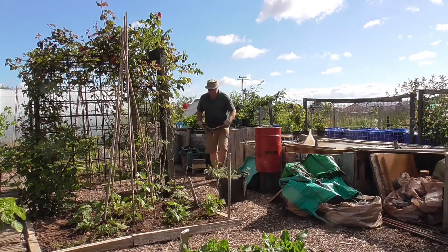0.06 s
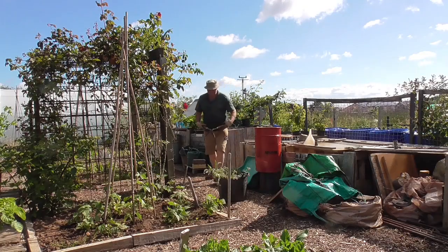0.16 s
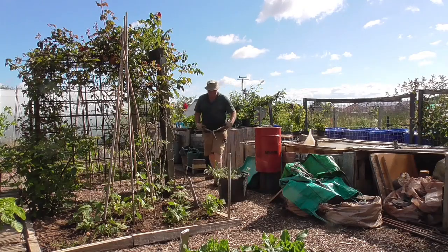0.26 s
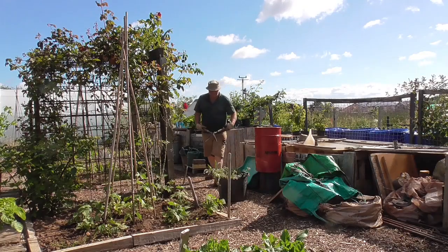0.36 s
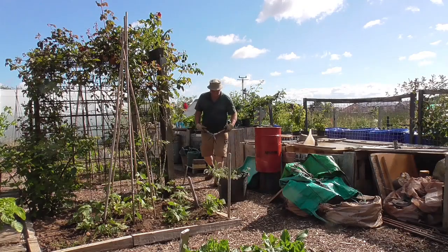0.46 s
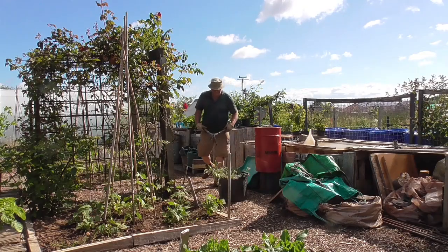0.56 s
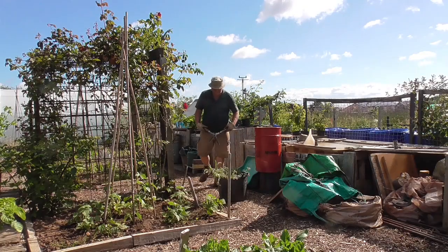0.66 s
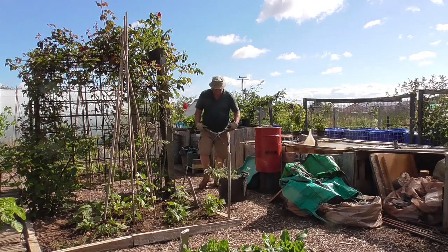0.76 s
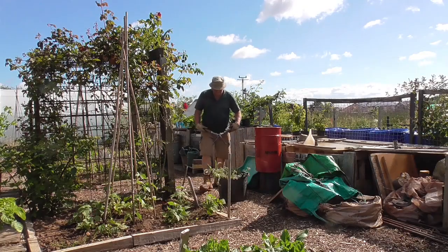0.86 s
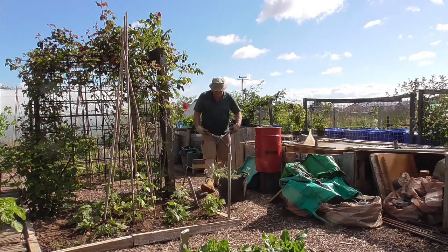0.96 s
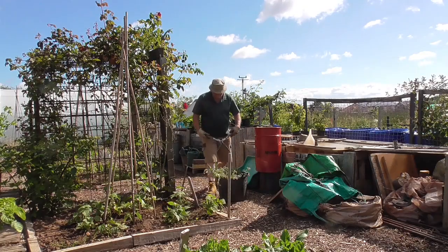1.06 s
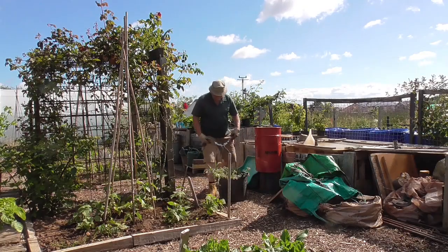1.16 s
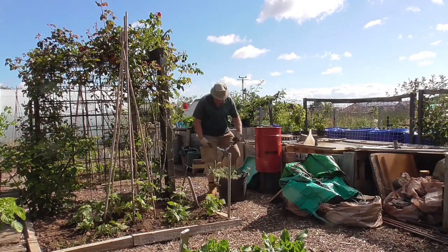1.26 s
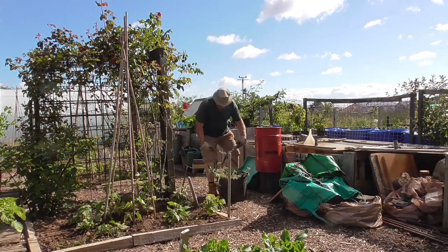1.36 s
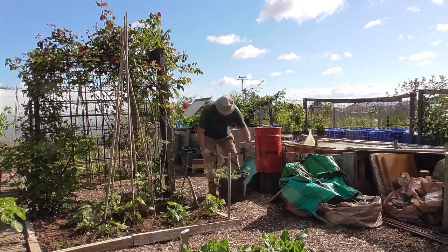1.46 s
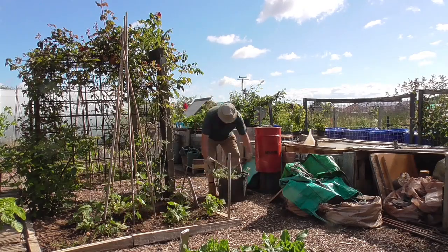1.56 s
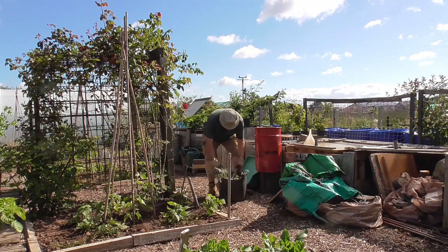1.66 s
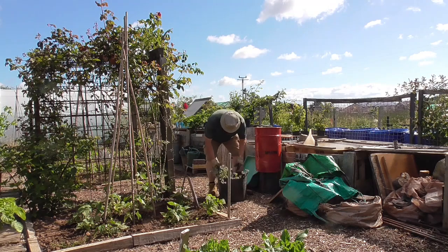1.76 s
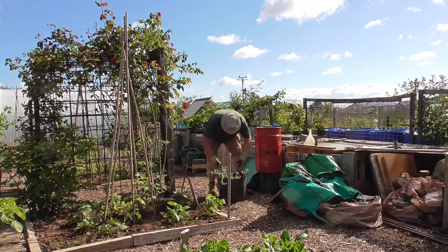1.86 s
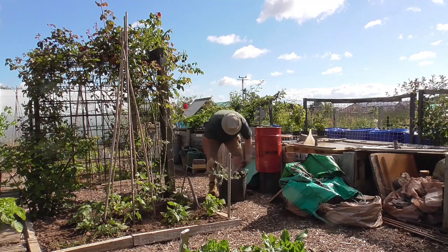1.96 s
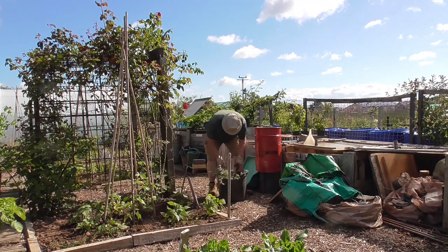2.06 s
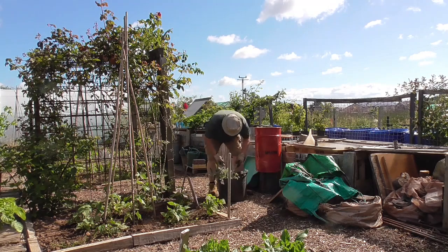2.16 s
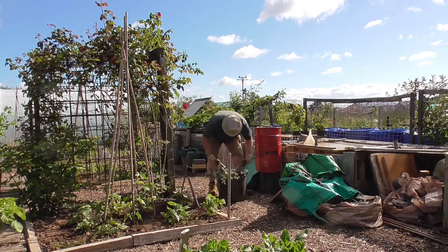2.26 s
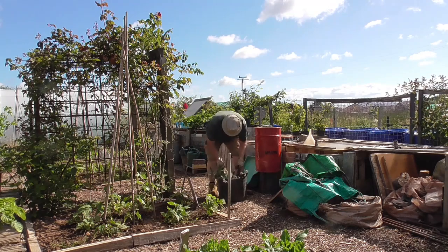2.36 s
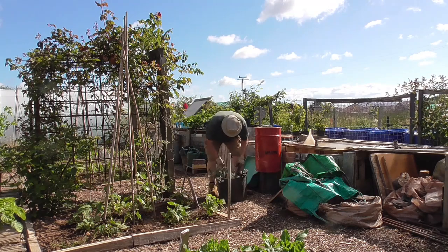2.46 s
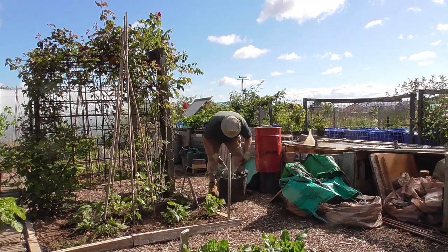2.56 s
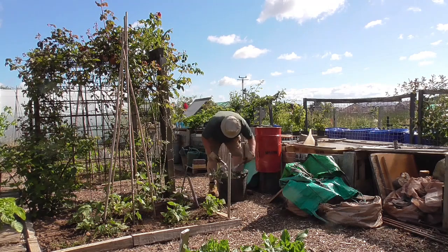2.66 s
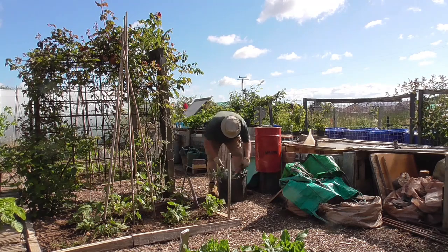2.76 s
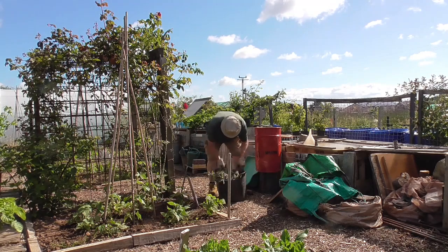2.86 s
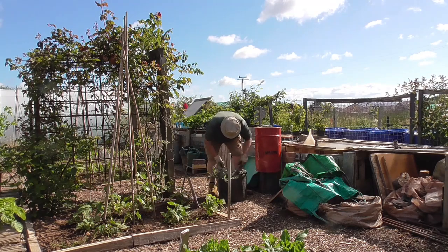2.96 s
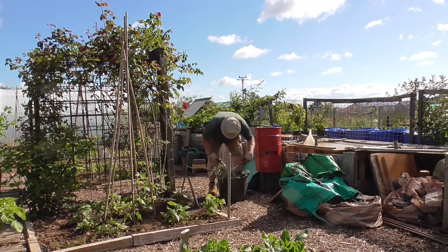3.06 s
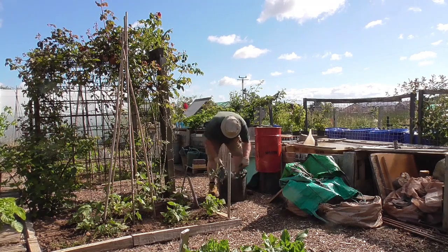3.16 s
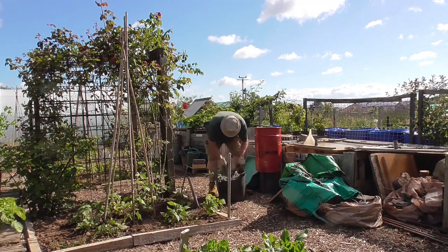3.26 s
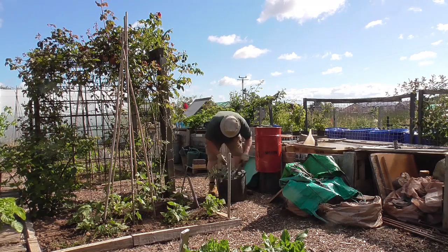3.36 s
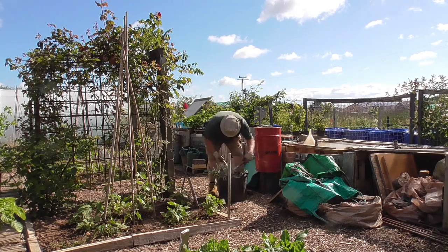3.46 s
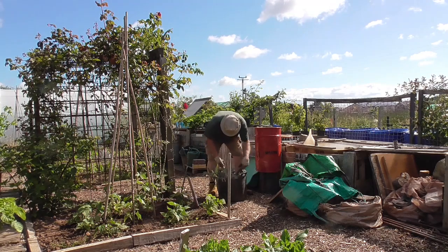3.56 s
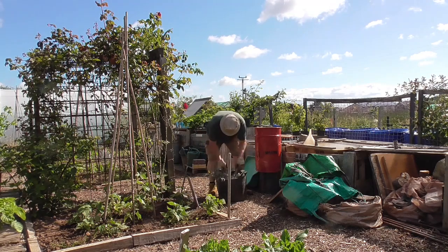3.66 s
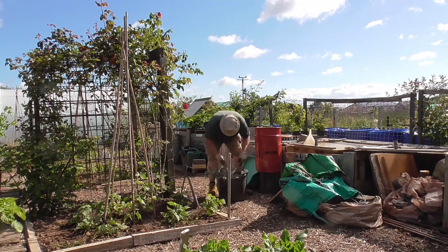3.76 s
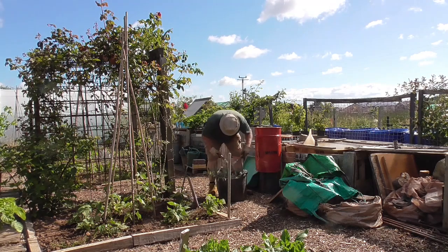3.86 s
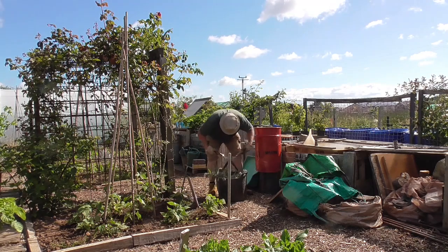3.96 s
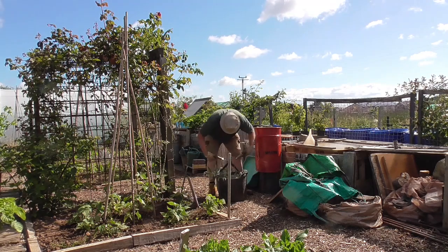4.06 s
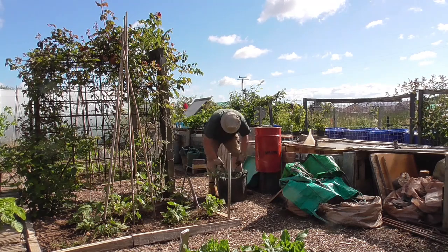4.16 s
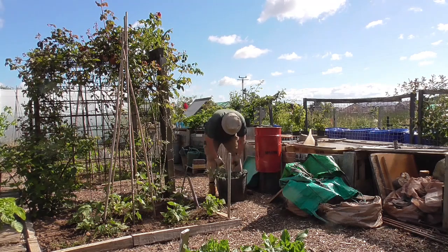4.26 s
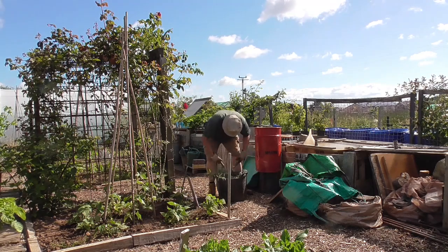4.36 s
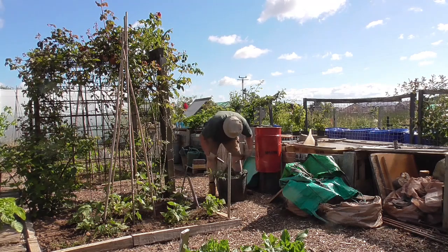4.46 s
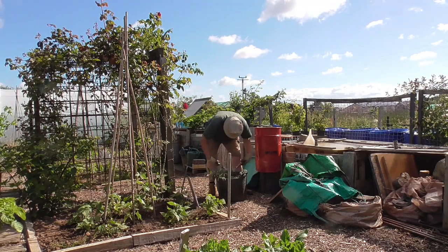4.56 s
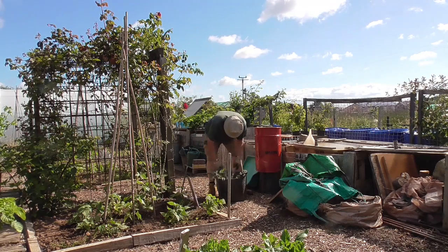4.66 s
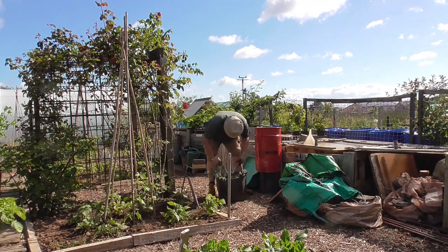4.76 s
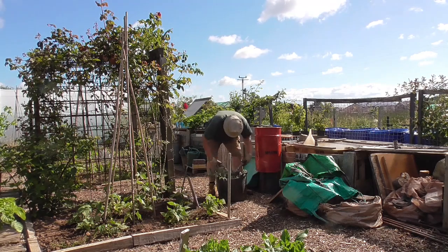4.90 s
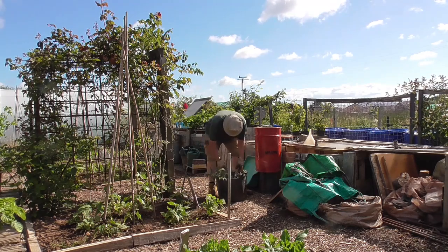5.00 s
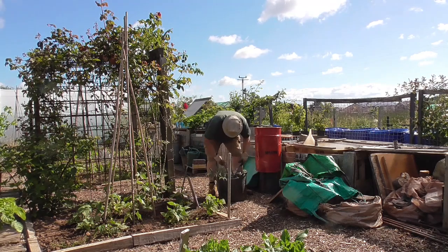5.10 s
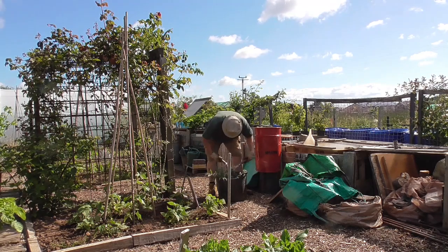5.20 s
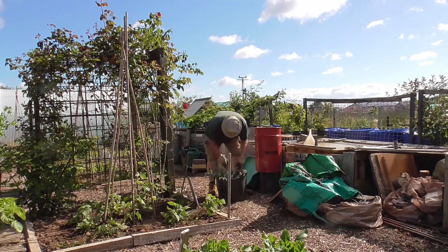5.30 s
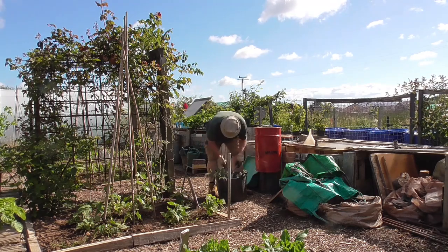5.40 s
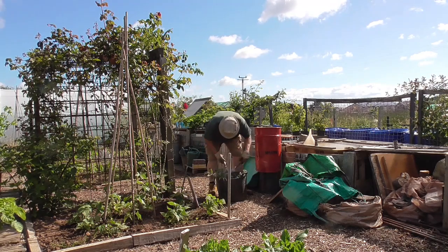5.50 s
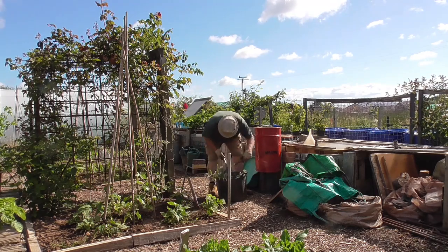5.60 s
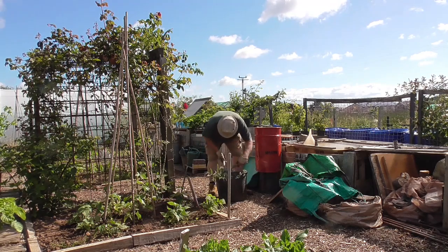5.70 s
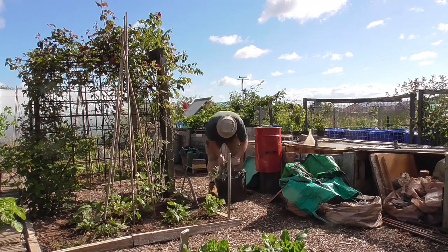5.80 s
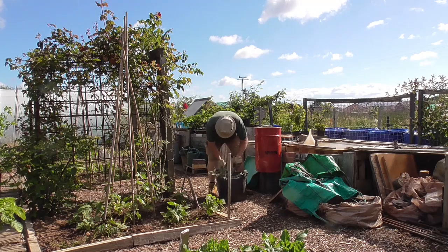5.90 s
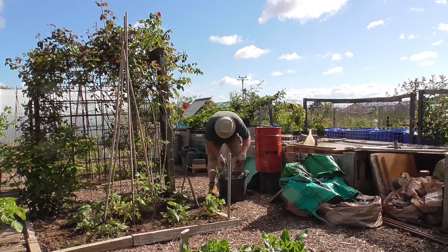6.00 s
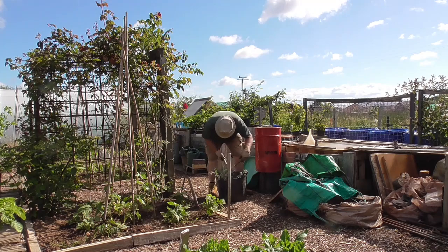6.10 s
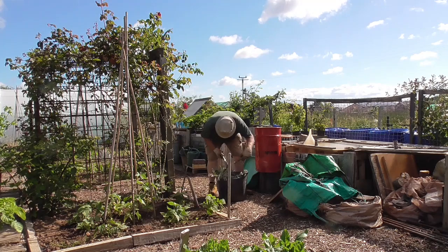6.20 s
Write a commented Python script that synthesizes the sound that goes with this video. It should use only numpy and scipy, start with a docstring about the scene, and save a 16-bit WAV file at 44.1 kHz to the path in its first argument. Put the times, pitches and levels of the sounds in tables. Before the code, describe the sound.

In an open garden plot, someone trims plants with hand snips a few metres from a stereo microphone. After a second of faint leaf handling, soft crunches lead into crisp, bright snaps every 0.3 to 0.6 seconds. Steel blades sing briefly at high pitch, a plastic tub booms and knocks, and leaves rustle between cuts. Distant traffic, a very faint twitter and slight hiss stay low underneath.

```python
"""In an open garden plot, snips cut leafy stems over a plastic tub a few metres away.
Each cut is crackling noise in a short swell; the steel blades hum and ring, and bursts make sharp snaps.
The tub booms through its resonances, and knocks ring at their own pitch.
Leaves rustle between cuts over traffic, a faint twitter, a passing tyre murmur and microphone hiss,
all made from coloured noise."""
import sys
import numpy as np
from scipy import signal
from scipy.fft import rfft, irfft
from scipy.io import wavfile
from scipy.ndimage import uniform_filter1d

SR = 44100
rng = np.random.default_rng(int(sys.argv[2]) if len(sys.argv) > 2 else 0)


def persist_wave(psi):
    """Save psi, clipped to +-1, as 16-bit WAV."""
    counts = np.round(np.clip(psi, -1, 1) * 32767).astype(np.int16)
    wavfile.write(sys.argv[1], SR, np.atleast_2d(counts).T)


N = 275184
SIDES = np.array([[1], [-1]])  # a sound times this is opposite in left and right


def undb(db):
    """Turn decibels into gain."""
    return 10 ** (np.asarray(db) / 20)


def peak(x):
    """Scale to peak 1."""
    return x / np.abs(x).max()


def unit(x, lo_hz=0, hi_hz=SR / 2):
    """Scale so that the part of the sound inside a band has rms 1."""
    power = np.abs(rfft(x)) ** 2
    bins_per_hz = power.shape[-1] * 2 / SR
    in_band = power[..., int(lo_hz * bins_per_hz):int(hi_hz * bins_per_hz)].sum()
    band_share = in_band / power.sum()
    return x / np.sqrt(np.mean(x ** 2) * band_share)


def shaped(x, points):
    """Colour a steady sound by (pitch_hz, level_db) points, joined on a log pitch scale."""
    hz, db = np.transpose(points)
    grid_hz = np.maximum(np.arange(N // 2 + 1) * SR / N, 1)
    gain = undb(np.interp(np.log(grid_hz), np.log(hz), db))
    return irfft(rfft(x) * gain, N)


def band(x, hz, width_hz):
    """A steep resonance: one peak filter applied twice, with gain 1 at its centre."""
    b, a = signal.iirpeak(hz, hz / width_hz, SR)
    once = signal.lfilter(b, a, x)
    return signal.lfilter(b, a, once)


def walk(rate_hz):
    """Random levels, held for 1 / rate_hz seconds and smoothed twice; spread near 1."""
    hold = max(int(SR / rate_hz), 1)
    steps = np.repeat(rng.standard_normal(N // hold + 1), hold)
    smooth = uniform_filter1d(uniform_filter1d(steps, hold), hold)
    return 1.61 * smooth[:N]


def grains(scatter_db, flicker_db, rate_hz):
    """Dense tiny cracks of uneven size that come in clusters."""
    noise = rng.standard_normal(N)
    size_db = scatter_db * np.minimum(rng.exponential(size=N), 5)
    cluster_db = flicker_db * walk(rate_hz)
    return noise * undb(size_db + cluster_db)


def add(out, s, sound, pan_db=0.):
    """Mix a short sound in at time s; a positive pan makes the left louder than the right."""
    i = int(s * SR)
    panned = undb([[pan_db / 2], [-pan_db / 2]]) * sound
    out[:, i:i + sound.shape[-1]] += panned[:, :N - i]


def wide(make, side_db):
    """Left and right made of one shared sound plus a second sound, opposite in the two sides."""
    return make() + undb(side_db) * make() * SIDES


def decay(t, t60):
    """Gain that falls 60 dB in t60 seconds (at least 5 ms)."""
    return np.exp(-np.log(1000) * t / max(t60, .005))


# Resonances of the hollow tub: pitch_hz, width_hz (of one filter pass), level_db
TUB_RESONANCES = [(210.5, 114, 1), (373.4, 157, -6.5), (538, 140, -3.5), (728, 250, -10.5),
                  (1202, 460, -12)]


def tub(x):
    """The hollow tub answers a sound at several resonances, with alternating sign."""
    total = 0
    for k, (hz, width_hz, db) in enumerate(TUB_RESONANCES):
        total = total + (-1) ** k * undb(db) * band(x, hz, width_hz)
    return total


# Colour of traffic and hiss: pitch_hz, relative level_db per Hz
AIR_COLOUR = [(15, -44), (25, -13.5), (87, 1.5), (206, -6.5), (516, -2.5), (677, -3.5), (863, 0),
              (1260, -7), (1890, -24), (2760, -28), (4030, -32), (5730, -29.5), (11600, -26),
              (14800, -30.5), (16000, -33)]
# How much left and right differ in it: pitch_hz, side_minus_mid_db
AIR_APART = [(25, -38.5), (100, -5.5), (1000, -4.5), (4000, -1), (16000, 0)]


def air():
    """Distant traffic and microphone hiss: coloured noise that swells a little."""
    def swelling_noise():
        return shaped(rng.standard_normal(N) * undb(.8 * walk(6)), AIR_COLOUR)

    mid, side = swelling_noise(), swelling_noise()
    both = mid + shaped(side, AIR_APART) * SIDES
    return unit(both) * undb(-56 + np.array([[-.8], [.8]]))


def twitter():
    """A faint, far twitter: a narrow band of noise near 4 kHz whose level flickers fast."""
    def flecks():
        return unit(band(rng.standard_normal(N) * undb(2.3 * walk(70)), 4140, 530))

    return undb(-80) * wide(flecks, -5)


LEVEL_TIMES_S = np.arange(0, N / SR, .001)  # levels are worked out every millisecond


def ramp(start, length, change_db, rise, fall):
    """Level in dB: rises to 0 at the start, changes steadily over the length, then falls (dB/s)."""
    t = LEVEL_TIMES_S - start
    before = rise * np.minimum(t, 0)
    during = change_db * np.clip(t / length, 0, 1)
    after = fall * np.maximum(t - length, 0)
    return before + during - after


BITE_DB_PER_S = 489  # rise of the crushing as a squeeze starts
BOOM_SWING, BOOM_FADE_DB_PER_S = 1.38, 413  # boom swing per dB of crushing; fall after the cut
SHUFFLE_EDGE_DB_PER_S, RUMBLE_FADE_DB_PER_S = 300, 30  # rise and fall; slow fade during a shuffle
# Cuts: close_s (blades close), squeeze_s (time before that), crush_db (as they close),
# build_db (change over the squeeze), release_db_per_s, boom_db (tub, as they close)
STROKES = [(1.115, 0.022, -65, 5, 400, -61), (1.774, 0.093, -44.5, -0.5, 600, -46.5),
           (2.15, 0.056, -37, 8, 448, -39.5), (2.464, 0.029, -40.5, 6.5, 507, -41.5),
           (2.901, 0.078, -43.5, 9, 450, -41.5), (3.313, 0.071, -39, 13.5, 450, -32),
           (3.711, 0.082, -40.5, 24, 402, -33), (4.293, 0.067, -39.5, 10.5, 455, -41),
           (4.734, 0.044, -44, 1, 409, -45), (5.069, 0.04, -43.5, 3, 502, -43.5),
           (5.418, 0.021, -39, 11, 350, -46.5), (5.913, 0.032, -40.5, 6.5, 353, -31.5)]
# Leaves shuffled between cuts: start_s, length_s, rustle_db, change_db (by the end), rumble_db (tub)
SHUFFLES = [(0.0, 0.13, -76.5, 3.5, -66), (0.393, .03, -69.5, -1, -65), (.47, 0.38, -72.5, -3.5, -66),
            (.9, 0.11, -76, -4, -68), (1.128, 0.17, -62, -6.5, -54.5), (1.32, 0.11, -74, -.7, -71),
            (1.512, 0.044, -67, -3, -48), (1.823, 0.21, -62, 5.5, -51), (2.207, 0.16, -57.5, -1.5, -55.5),
            (2.507, 0.25, -65, 2.5, -54.5), (2.959, 0.21, -59.5, -1.5, -50), (3.358, 0.24, -56, -10.5, -50),
            (3.758, 0.33, -59, -18, -57), (4.335, 0.16, -56.5, -3.5, -58), (4.543, 0.038, -60.5, 3.5, -59),
            (4.805, 0.14, -60, -3, -57), (5.13, 0.18, -61.5, -3, -63), (5.458, 0.035, -63, -4, -73),
            (5.533, 0.025, -61, -3, -70), (5.58, 0.19, -67.5, -6.5, -73), (5.811, .05, -60.5, -5, -51.5),
            (5.983, 0.23, -63, -2, -59.5)]


def effort():
    """Levels in dB of the work on the fibres and of the tub: powers summed over cuts and shuffles."""
    work = boom = 1e-12
    # undb of twice the level gives power
    for close, squeeze, crush_db, build_db, release, boom_db in STROKES:
        start = close - squeeze
        crush_shape = ramp(start, squeeze, build_db, BITE_DB_PER_S, release)
        work = work + undb(2 * (crush_db - build_db + crush_shape))
        swing_db = BOOM_SWING * build_db
        boom_shape = ramp(start, squeeze, swing_db, BOOM_SWING * BITE_DB_PER_S, BOOM_FADE_DB_PER_S)
        boom = boom + undb(2 * (boom_db - swing_db + boom_shape))
    edge = SHUFFLE_EDGE_DB_PER_S
    for start, length, rustle_db, change_db, rumble_db in SHUFFLES:
        work = work + undb(2 * (rustle_db + ramp(start, length, change_db, edge, edge)))
        fade_db = -RUMBLE_FADE_DB_PER_S * length
        boom = boom + undb(2 * (rumble_db + ramp(start, length, fade_db, edge, edge)))
    times = np.arange(N) / SR
    return [np.interp(times, LEVEL_TIMES_S, 10 * np.log10(power)) for power in (work, boom)]


FIBRE_BAND_HZ, TUB_BAND_HZ = (2000, 6500), (130, 700)  # where the levels are set
# Colour of crushed fibres: pitch_hz, relative level_db per Hz
CRUSH_COLOUR = [(410, -33), (700, -3.5), (1380, -3), (2460, -7.5), (4610, -2.5), (5920, -6), (7890, -3),
                (12300, -9.5), (14800, -19.5), (16000, -44)]
# Colour laid over the crackling leaves: pitch_hz, relative level_db
RUSTLE_COLOUR = [(880, -5), (1500, -0.5), (2510, -4), (4500, 0.5), (5880, -3.5), (11000, -5), (13100, -9),
                 (15200, -22), (16000, -40)]
# Ringing modes of the steel blades: pitch_hz, hum level_db, hum t60_s (time to fall 60 dB)
BLADE_MODES = [(7085, -7, .06), (7660, 0, .09), (7820, -3, .08), (8190, -10, .06)]


def hands():
    """Light handling rustles leaves; harder work crushes fibres and makes blades hum; the tub booms."""
    work_db, boom_db = effort()
    hard = np.clip((work_db + 62.5) / 12, 0, 1)  # 0 light, 1 hard

    def crushing():
        return unit(shaped(grains(2.1, 1.58, 150), CRUSH_COLOUR), *FIBRE_BAND_HZ)

    def rustling():
        # each band crackles on its own
        patches = sum(band(grains(2.5, 1.6, 40), hz, .9 * hz) for hz in (1500, 2800, 5000, 9000, 14000))
        return unit(shaped(patches, RUSTLE_COLOUR), *FIBRE_BAND_HZ)

    def stirring():
        return unit(tub(grains(2.0, 1.2, 90)), *TUB_BAND_HZ)

    crush = wide(crushing, -9.5)
    push = crush * hard * undb(work_db)
    # a longer ring means a narrower resonance
    hum = sum(undb(db) * band(push, hz, 9.9 / t60) for hz, db, t60 in BLADE_MODES)
    rustle = wide(rustling, -7)
    boom = wide(stirring, -12.5) * undb([[-.9], [.9]])
    fibres = np.sqrt(hard) * crush + np.sqrt(1 - hard) * rustle
    return undb(work_db) * fibres + undb(5.5) * hum + undb(boom_db) * boom


# Knocks on the tub and the ground: start_s, level_db (peak before panning), pitch_hz
KNOCKS = [(0.402, -47, 410), (0.465, -42.5, 148), (1.116, -36, 684), (1.496, -37.5, 438), (1.514, -40, 235),
          (1.537, -42, 420), (2.119, -31, 518), (2.462, -36.5, 226), (2.884, -31.5, 262), (2.993, -42, 220),
          (3.068, -35.5, 527), (3.281, -20, 342), (3.307, -15, 501), (3.488, -47, 136), (3.688, -30, 510),
          (3.705, -23, 599), (3.937, -44.5, 294), (4.233, -36.5, 245), (4.269, -32, 223), (4.281, -24, 205),
          (4.679, -40, 220), (5.409, -32.5, 190), (5.7974, -30, 212), (5.877, -22, 570), (5.901, -25, 221),
          (6.027, -44, 226), (6.057, -44, 230), (6.095, -44, 228)]


def knocks():
    """A blow of a few milliseconds rings the tub's wall at its own pitch and stirs the hollow."""
    out, t = np.zeros((2, N)), np.arange(int(.2 * SR)) / SR
    for s, db, hz in KNOCKS:
        blow = rng.standard_normal(len(t)) * decay(t, 0.011)
        t60 = 7.9 / hz + .05  # 7.9 cycles plus 50 ms
        wall = np.sin(2 * np.pi * hz * t) * (1 - np.exp(-t / 0.002)) * decay(t, t60)
        hollow = undb(0.5) * peak(tub(blow))
        thud = undb(-19.5) * peak(band(blow, 690, 900))
        add(out, s, undb(db) * peak(wall + hollow + thud), -2.0)
    return out


# Blades closing or stems breaking: start_s (0.94 ms is added), level_db (peak of the middle band
# before panning), treble_db and body_db (peaks against the middle band)
SNAPS = [(0.602, -52, -16, -9), (0.8041, -55, -17, -9), (1.113, -39, 0, -17), (1.12, -34, -30, -4.5),
         (1.4012, -51, -18, -4), (1.565, -50, -17, -2), (1.882, -49, 4, -12), (2.154, -10.5, -10, -14.5),
         (2.2726, -36.5, -25, -19), (2.2944, -41.5, -19, -2.5), (3.0691, -47, -14, 8),
         (3.3089, -10, -3.5, -10), (3.4906, -51.5, -7, 15), (3.631, -43, -12, 0.5), (3.7047, -7.5, -8, -49),
         (4.1975, -47, -12, -15), (4.2917, -8.5, -1.5, -13), (4.388, -50.5, -9, 5),
         (4.4622, -38, -27.5, -21), (4.557, -47, -12, -16), (5.3123, -55, -23, -8), (5.4126, -8, -1.5, -11),
         (5.5288, -45, -21, -4), (5.7967, -44, -18, 2), (5.8067, -38, -19, -18), (5.8779, -25.5, -3, -0.5),
         (5.91, -10, -5, -14.5), (6.166, -46.5, -25, -12)]


def snaps():
    """A crack of a few milliseconds in three bands of noise, then a short scatter from the sheds."""
    out, t = np.zeros((2, N)), np.arange(int(.1 * SR)) / SR
    scatter = undb(-18.5) * decay(t, 0.12)
    shape = (1 - np.exp(-t / 0.00035)) * (decay(t, 0.018) + scatter)
    for s, db, treble_db, body_db in SNAPS:
        shared, apart = rng.standard_normal((2, len(t))) * shape
        apart = apart * SIDES
        crack = peak(band(shared + undb(-10.5) * apart, 4770, 5440))
        treble = peak(band(shared + undb(-3.5) * apart, 7850, 5200))
        treble = undb(treble_db) * treble * undb([[-.8], [.8]])
        body = undb(body_db) * peak(band(shared + undb(-19) * apart, 1300, 620))
        add(out, s + 0.00094, undb(db) * (crack + treble + body), -.6)
    return out


PING_T60_S, OPEN_PING_T60_S = 0.051, 0.11  # with a stem between the blades; open
# Blades rubbing until they sing: start_s, level_db (peak before panning), pitch_hz (favours nearby modes)
PINGS = [(2.087, -37, 7540), (2.0956, -34, 7970), (2.1176, -25, 7930), (2.156, -19, 7570),
         (2.1674, -26, 7860), (2.358, -48, 7500), (2.375, -37.5, 7430), (2.4423, -29, 7980),
         (2.466, -41, 8000), (2.851, -31.5, 7620), (2.866, -34, 7090), (3.2867, -24, 7970),
         (3.305, -25, 7900), (3.3135, -26.5, 7920), (3.345, -50, 7800), (3.5982, -49, 7600),
         (3.6616, -39, 8000), (3.68, -33.5, 7090), (3.704, -20, 7390), (3.716, -31, 7090),
         (3.7214, -28, 7700), (4.163, -62, 7090), (4.2942, -27, 7500), (4.3044, -25, 7400),
         (4.59, -59, 8200), (4.6838, -38, 7600), (4.7102, -24, 7930), (5.0386, -26.5, 7780),
         (5.052, -29, 7600), (5.321, -44.5, 7430), (5.406, -27, 7700), (5.4131, -20, 7770),
         (5.432, -32, 7900), (5.813, -49, 8200), (5.886, -30.5, 7820), (5.9174, -30, 7800)]


def pings():
    """A brief uneven rub rings the blade modes near its pitch, out of step at the two microphones."""
    out, t = np.zeros((2, N)), np.arange(int(.15 * SR)) / SR
    lead = 0.46 * np.array([[.5], [-.5]])  # phase of left and right, radians
    for s, db, rub_hz in PINGS:
        cutting = any(close - squeeze - .02 < s < close + .02 for close, squeeze, *_ in STROKES)
        t60 = PING_T60_S if cutting else OPEN_PING_T60_S
        ring = 0
        for mode_hz, _, _ in BLADE_MODES:
            nearness = np.exp(-((mode_hz - rub_hz) / 170) ** 2)
            phase = rng.uniform(0, 2 * np.pi)
            ring = ring + nearness * np.sin(2 * np.pi * mode_hz * t + phase + lead)
        wobble = unit(uniform_filter1d(rng.standard_normal(len(t)), size=150))
        grip = undb(2.03 * wobble)
        swell = (1 - np.exp(-t / 0.0016)) * decay(t, t60)
        add(out, s, undb(db) * peak(swell * grip * ring), -2.2)
    return out


def murmur():
    """A far vehicle's tyre murmur: a band of noise near 740 Hz that swells and fades around 4.8 s."""
    def tyres():
        return unit(band(rng.standard_normal(N), 740, 250))

    swell = np.exp(-((np.arange(N) / SR - 4.8) / 1.1) ** 2)
    return undb(-59.5) * swell * wide(tyres, -17)


def scene():
    """All sources together."""
    return air() + twitter() + hands() + knocks() + snaps() + pings() + murmur()


def record(dry):
    """A steep low-pass filter cuts the treble above 15.9 kHz."""
    low_pass = signal.ellip(10, .2, 70, 15900, fs=SR, output="sos")
    return signal.sosfilt(low_pass, dry)


dry = scene()
out = record(dry)
persist_wave(out)
```